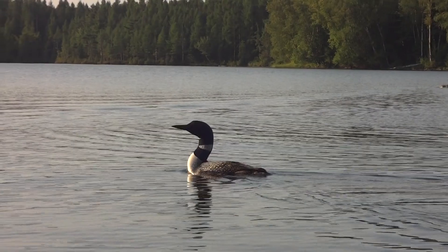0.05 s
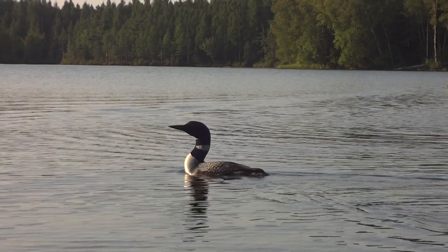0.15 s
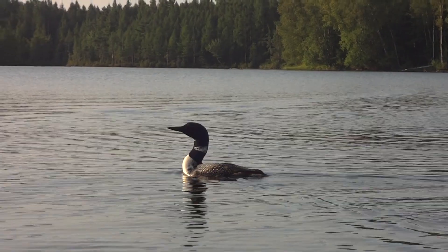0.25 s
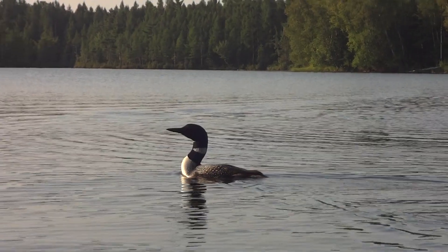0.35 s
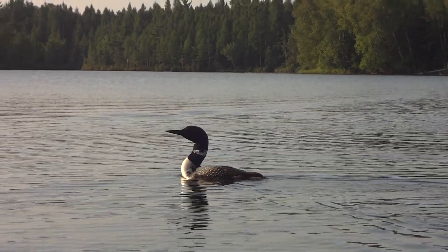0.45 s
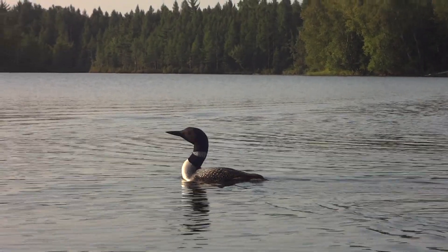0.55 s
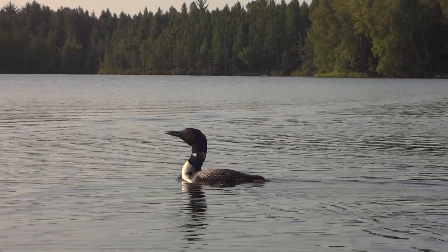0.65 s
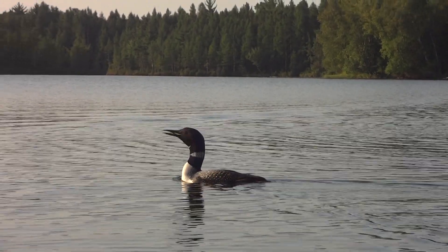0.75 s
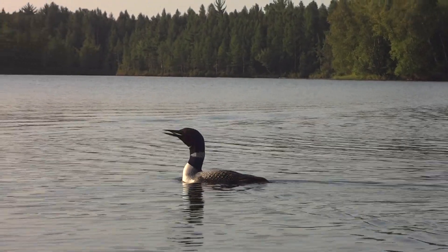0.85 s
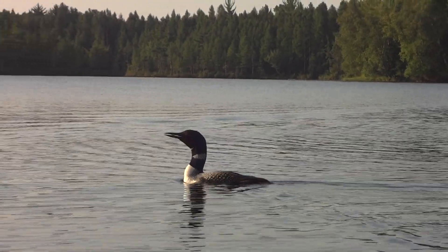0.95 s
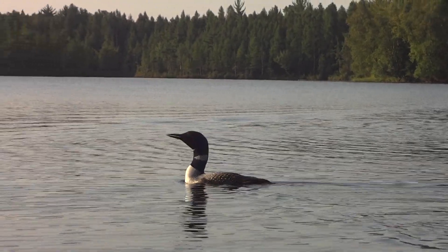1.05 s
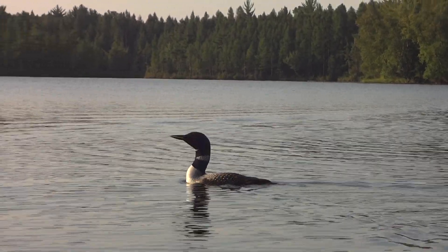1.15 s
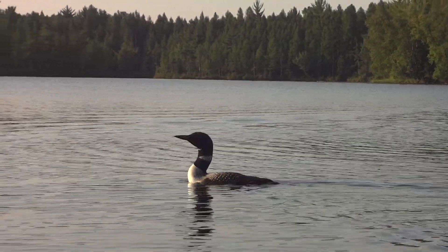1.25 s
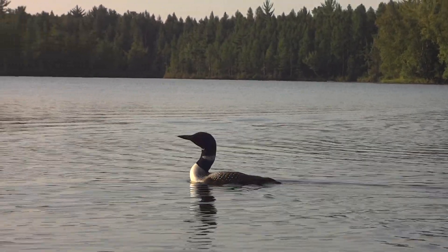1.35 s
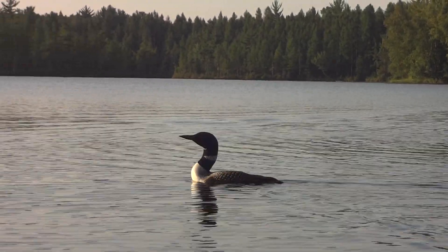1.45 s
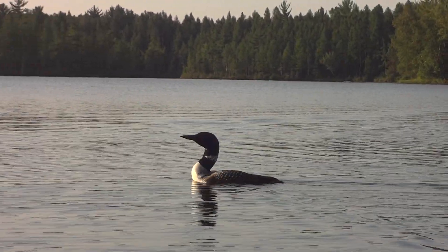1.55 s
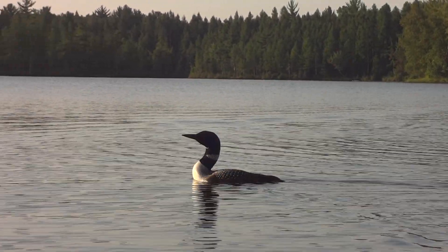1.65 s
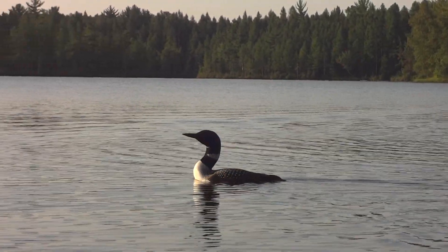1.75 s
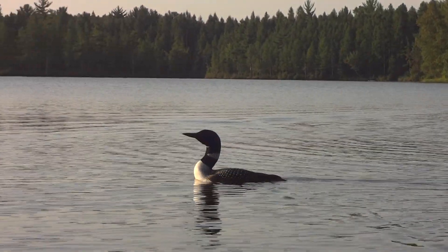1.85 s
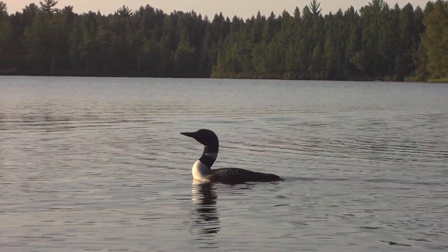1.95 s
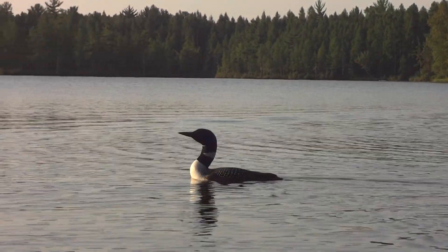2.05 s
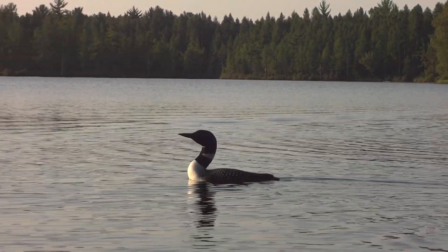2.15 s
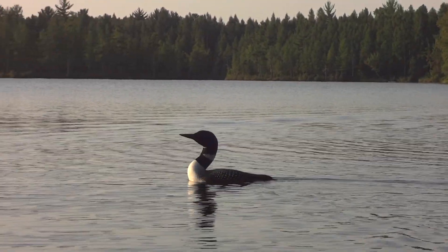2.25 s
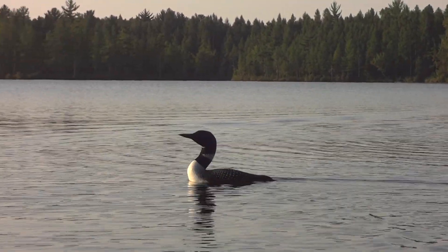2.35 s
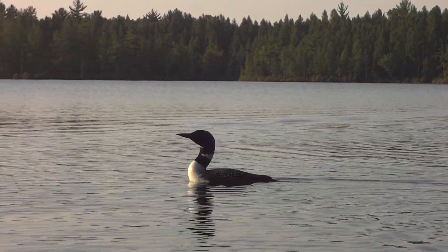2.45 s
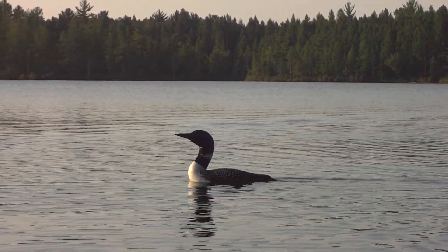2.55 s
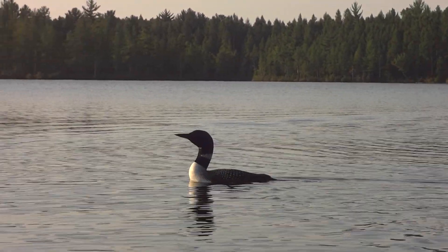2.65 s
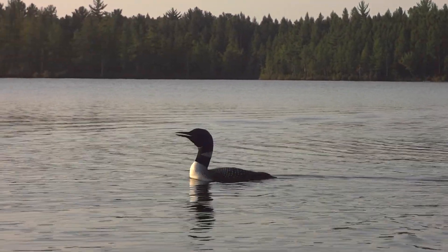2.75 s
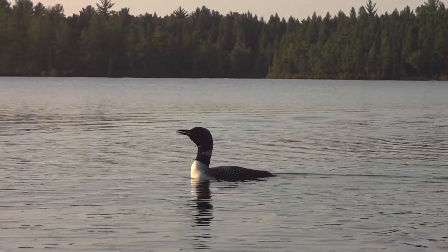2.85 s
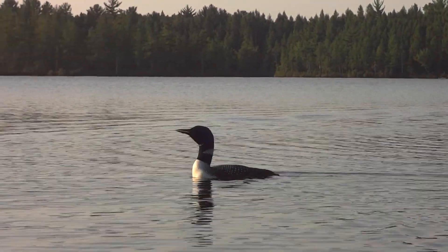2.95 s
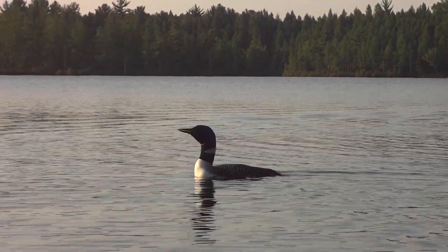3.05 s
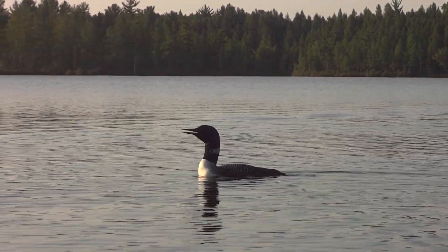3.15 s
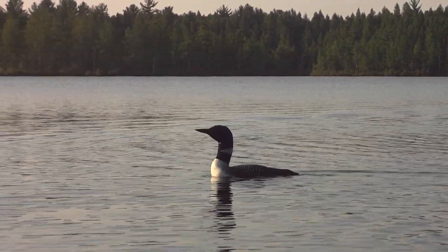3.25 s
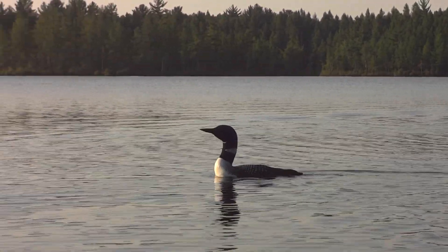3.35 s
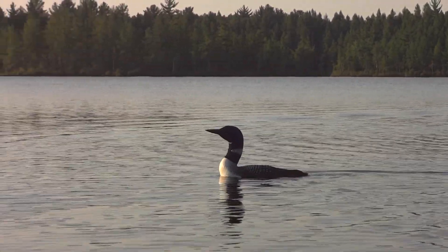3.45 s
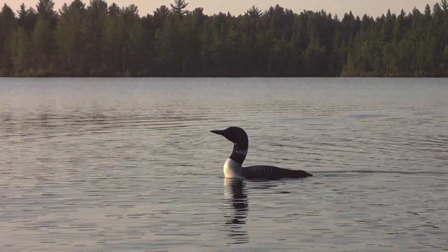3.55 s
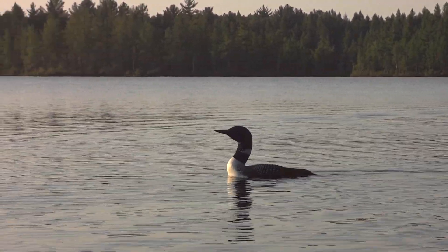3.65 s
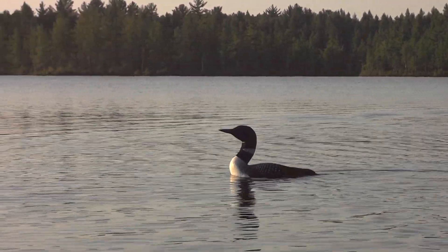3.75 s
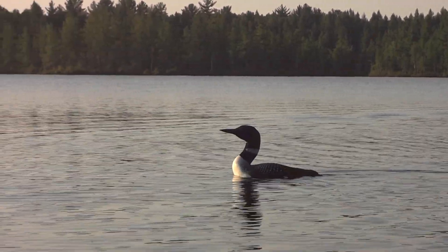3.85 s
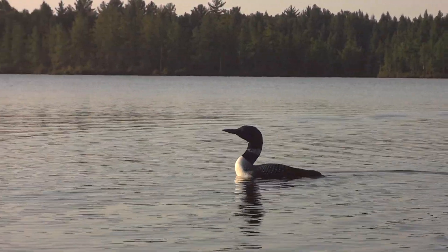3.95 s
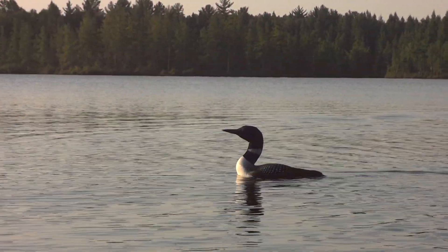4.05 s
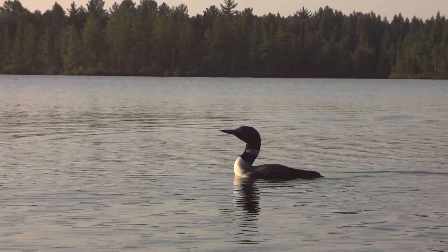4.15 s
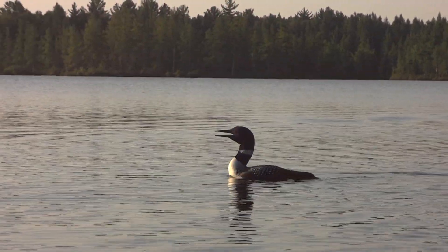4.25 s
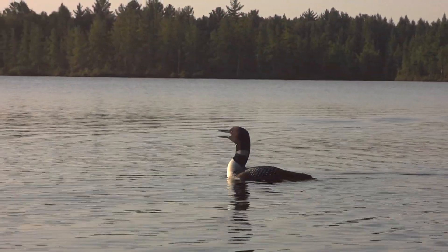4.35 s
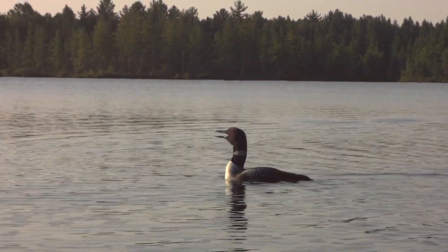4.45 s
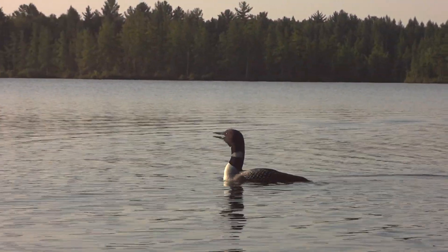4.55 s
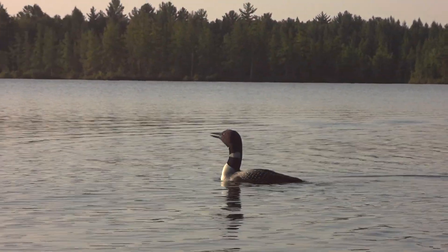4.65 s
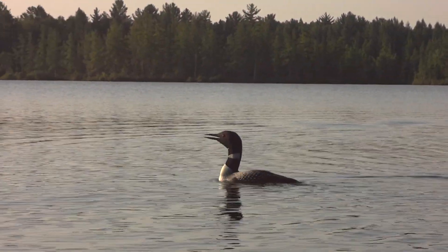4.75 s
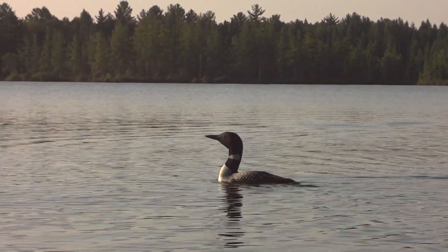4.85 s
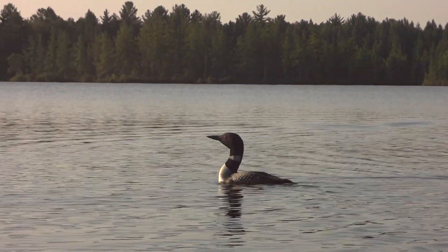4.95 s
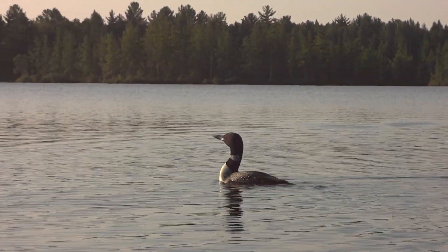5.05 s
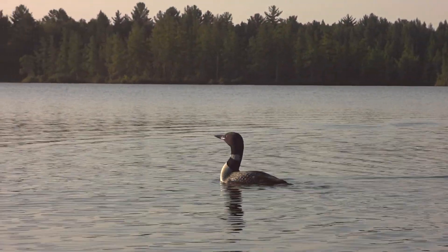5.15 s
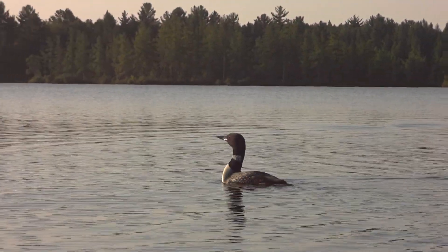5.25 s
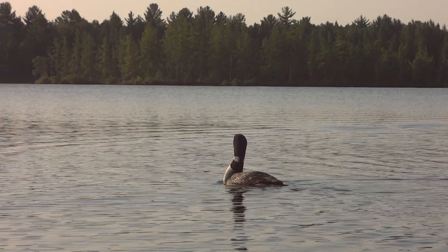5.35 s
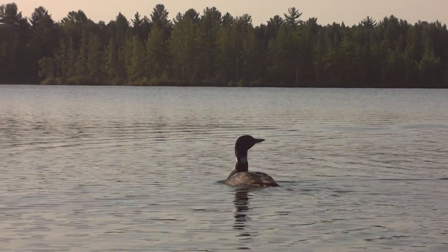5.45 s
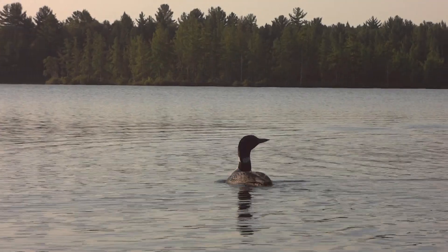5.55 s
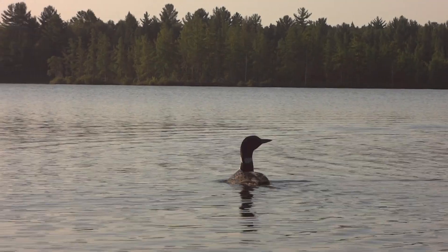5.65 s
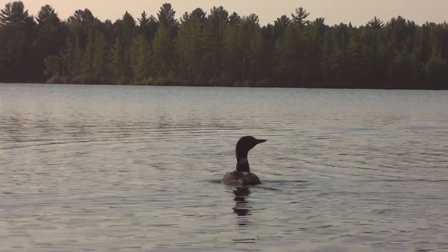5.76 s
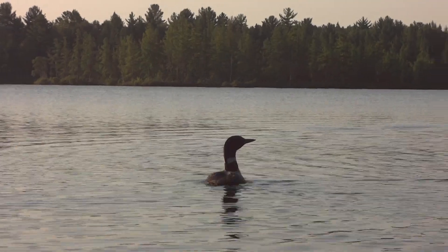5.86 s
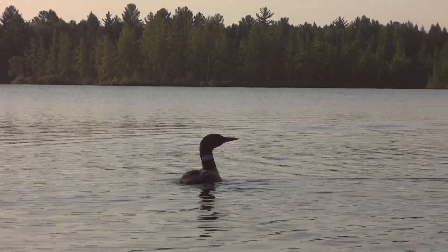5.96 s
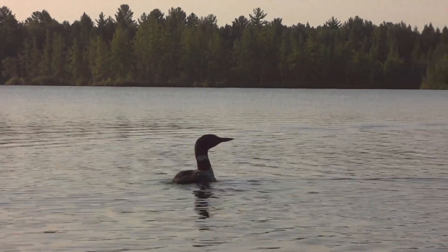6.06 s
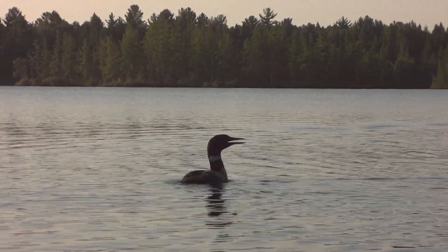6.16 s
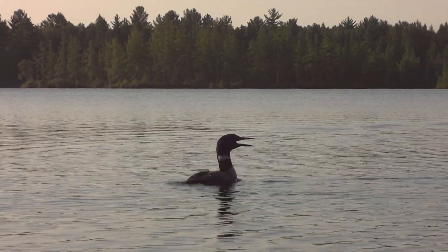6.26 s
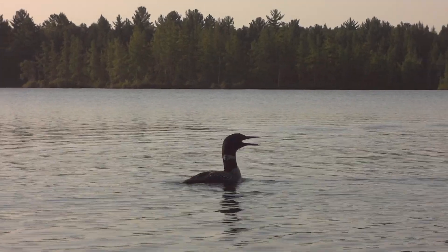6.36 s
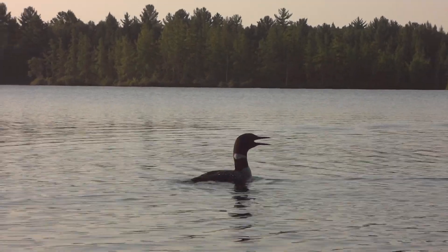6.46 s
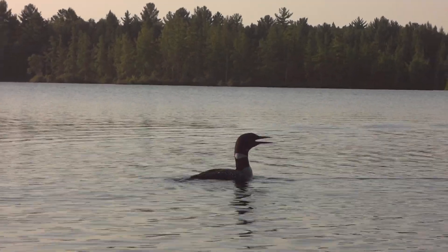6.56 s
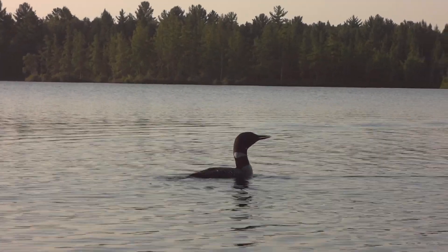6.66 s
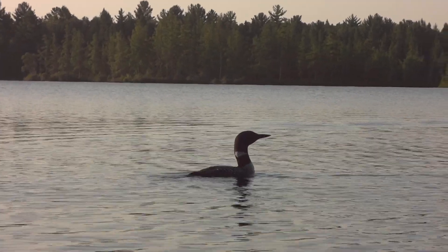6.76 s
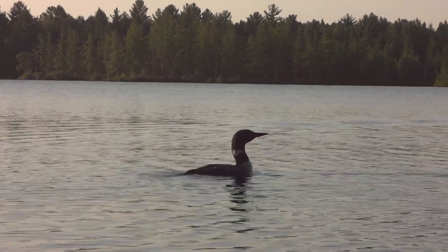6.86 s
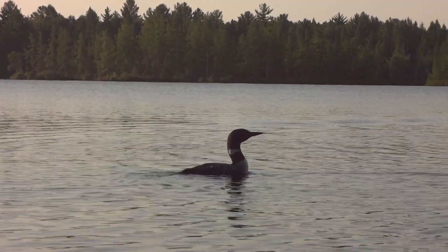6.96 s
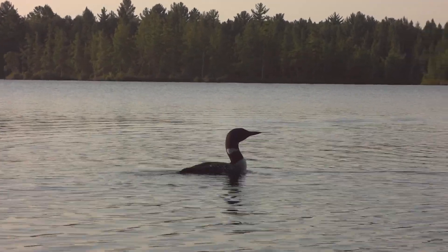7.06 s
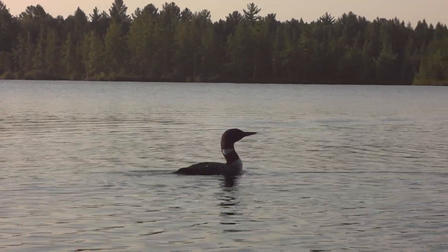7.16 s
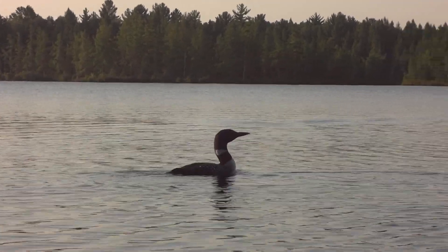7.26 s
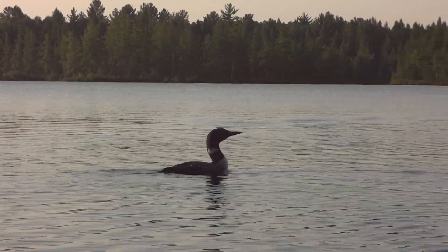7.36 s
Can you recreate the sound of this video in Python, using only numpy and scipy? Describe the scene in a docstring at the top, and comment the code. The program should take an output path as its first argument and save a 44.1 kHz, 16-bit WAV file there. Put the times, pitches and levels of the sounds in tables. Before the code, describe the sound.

Rapid, laughing loon tremolos ring over quiet water, each followed by a distant bird's softer reply, above low air rumble and faint ripples.

```python
"""Loon tremolos on a calm lake

Stereo camera microphone on a calm lake: a loon right of centre gives four loud tremolos; a second loon,
farther off and further right, answers softly. Rotating vibrations leap between two registers, at moments
beating with extra tones; throat resonances shape the overtones. The wooded shore echoes, mostly .85 s later.
Shaped noise makes air rumble, ripples, hiss, bumps and ticks at the microphone; thin tones make the whine.
Gain control flattens the crests and lets the background back slowly. Table levels are ahead of it.
"""
import sys
import numpy as np
from scipy import signal
from scipy.fft import rfft, irfft
from scipy.io import wavfile
from scipy.ndimage import uniform_filter1d

SR = 44100
rng = np.random.default_rng(int(sys.argv[2]) if len(sys.argv) > 2 else 0)


def unload_audio(sound):
    """Save the sound as a 16-bit wav file, at the path given as the first command line argument."""
    columns = np.transpose(np.atleast_2d(sound))
    # keep every value between -1 and 1, then stretch to whole-number steps
    steps = np.round(np.clip(columns, -1, 1) * 32767)
    wavfile.write(sys.argv[1], SR, steps.astype(np.int16))


N = 326340

# air moving on the microphone, before its flutter: t/s, level/dB
RUMBLE_LEVEL = [(0, -49), (1.3, -52), (1.55, -48), (2, -52), (2.7, -53), (3.5, -55.5), (3.9, -42.5),
                (4.3, -54.5), (4.8, -49), (5.6, -52.5), (6.2, -54), (6.9, -47.5), (7.4, -49)]
# relative spectrum of the rumble: f/Hz, density/dB per Hz
RUMBLE_COLOUR = [(20, 0.5), (40, 3), (90, -0.5), (130, -11), (200, -20), (320, -33), (600, -48.5)]
# ripples and distant trees, before their flutter: t/s, level/dB
RIPPLE_LEVEL = [(0, -63), (.6, -64.5), (1.4, -59.5), (2.2, -62), (2.7, -63.5), (4.2, -64), (4.9, -54.5),
                (5.3, -53.5), (5.9, -58), (6.3, -59.5), (7.4, -63)]
# relative spectrum of the ripples: f/Hz, density/dB per Hz
RIPPLE_COLOUR = [(100, -9), (250, 0), (500, -0.5), (1200, -4.5), (2500, -10), (4500, -15), (7000, -18),
                 (15000, -21.5)]
# camera electronics, steady tones that waver slightly: centre f/Hz, level/dB
WHINE = [(13487, -85), (13906, -86.5), (15734, -90.5)]
# one row per call, the loud ones from the near loon, the soft ones from the far loon: start t/s, end t/s,
# mid closing note f/Hz, level between pulses/dB, closing level/dB, fade-out/s, left minus right/dB
CALLS = [ (0.161, 0.224, 797, -41.5, -59, 0.041, -3), (0.671, 1.265, 549, -19, -23, 0.033, -1.8),
         (1.443, 2.021, 641, -31.5, -40, 0.011, -3.4), (2.787, 3.326, 526, -20, -26, 0.051, -2),
         (3.56, 4.07, 677, -39.5, -48, 0.013, -4.5), (4.322, 4.943, 553.4, -20, -22.5, 0.032, -2),
         (4.987, 5.658, 669, -26.5, -38.5, 0.036, -4), (6.253, 6.842, 551, -22.5, -33, .015, -2.2),
         (6.82, 7.003, 693, -40.5, -45.5, 0.017, -4.7), ]
# tremolo pulses: crest t/s, swoop from f/Hz, swoop to f/Hz, crest level/dB, overtone lift/dB
# (in the low register the level is capped)
PULSES = [ (0.193, 639.4, 880, -34.5, 15), (0.69, 560, 695.6, -16.5, 4), (0.777, 630, 1146, -10.5, 10.5),
          (0.871, 986, 1457, -6.5, 1.5), (.967, 1065, 1433, -6.5, 8.5), (1.069, 1069, 1361, 0.5, 3),
          (1.188, 605, 1010, -12.5, 10), (1.449, 900, 904, -30, 14.5), (1.542, 817, 992, -29.5, 17),
          (1.618, 1124, 1349, -16.5, 15), (1.711, 1197, 1322, -14.5, 10.5), (1.792, 1177, 1382, -18, 7.5),
          (1.888, 1097, 1260, -17, 12), (1.972, 988, 1031, -33, -0.5), (2.82, 600, 738.7, -17.5, 10.5),
          (2.904, 885, 1143, -10, 7.5), (3.0, 850, 1393, -9, 4.5), (3.103, 1043, 1356, -3.5, 6.5),
          (3.211, 608, 1043, -10, 8), (3.573, 800, 877, -33, 10), (3.659, 690, 980, -21, 12.5),
          (3.744, 960, 1322, -22, 7.5), (3.826, 1291, 1443, -30, 19), (3.908, 1310, 1446, -35, 20),
          (3.997, 1288, 1442, -35.5, 12), (4.34, 590, 689.4, -16, 8.5), (4.427, 628, 1149, -12, 0.5),
          (4.525, 1050, 1398, -7, -1.5), (4.618, 1084, 1425, -3, -1), (4.718, 1067, 1371, 2, 4.5),
          (4.823, 1040, 1292, 3, 8), (5.044, 670, 860, -33.5, 9), (5.138, 748, 1339, -19.5, -4),
          (5.225, 1117, 1379, -26.5, 8.5), (5.311, 1076, 1353, -23, -8.5), (5.401, 1067, 1306, -21, -9.5),
          (5.492, 1031, 1350, -20.5, -3.5), (5.566, 1064, 1081, -30, -2), (6.26, 600, 654.4, -16.5, 8),
          (6.354, 606, 1155, -10, 3), (6.446, 989, 1393, -7, 6.5), (6.545, 1089, 1367, -2, 12.5),
          (6.647, 1060, 1320, -5.5, 11), (6.773, 602, 948, -16.5, 2), (6.828, 850, 916, -39, -17),
          (6.923, 765, 1233, -27.5, 3), ]
# register flips, from a low opening to a low closing note: t/s
BREAKS = [.212, .748, 1.123, 1.17, 1.231, 1.553, 1.995, 2.828, 3.158, 3.194, 3.276, 3.664, 4.045, 4.4,
          4.866, 5.094, 5.574, 6.33, 6.702, 6.758, 6.81, 6.898, 6.973]
# brief extra loon tones: second notes beating with a call, snatches of the other loon's call, faint lone hoots:
# start t/s, end t/s, start f/Hz, middle f/Hz, end f/Hz, level/dB
EXTRA_TONES = [(.812, .834, 800, 760, 780, -35), (.864, .908, 1680, 1660, 1420, -20),
               (.966, 1.0, 1700, 1640, 1480, -19), (1.765, 1.8, 1330, 1550, 1570, -26),
               (2.984, 3.034, 1130, 1200, 1090, -17), (4.452, 4.48, 1000, 880, 820, -32),
               (4.61, 4.634, 1720, 1730, 1660, -36), (5.385, 5.42, 1000, 970, 920, -39),
               (6.37, 6.405, 1660, 1730, 1650, -41), (6.385, 6.5, 730, 830, 950, -40),
               (6.51, 6.585, 1080, 1270, 1040, -25), (6.77, 6.812, 1060, 1130, 1260, -30),
               (.265, .305, 740, 830, 710, -56), (3.49, 3.52, 630, 580, 570, -46)]
# overtone strength through throat and bill, before effort brightens it: f/Hz, level/dB re the fundamental
THROAT = [(1100, -3), (1400, -7), (1700, -21), (2000, -36), (2300, -41), (2650, -51), (3200, -41),
          (3700, -52), (4400, -43), (5300, -55), (6700, -74), (10000, -72), (13000, -74), (15500, -87)]
# calls at the two microphone ports: f/Hz, phase by which the left port leads/rad
PORT_PHASE = [(0, 0), (780, -0.13), (1400, -0.31), (5680, 0), (15400, 0)]
# soft knocks on the camera and small plops of water: t/s, f/Hz, swell length (one sigma)/s, level/dB
BUMPS = [(0.566, 110, 0.034, -44.5), (0.622, 158, 0.0079, -27), (0.647, 101.3, 0.037, -37.5),
         (0.698, 139, 0.025, -30), (7.038, 98.6, 0.018, -23), (7.042, 230, 0.011, -37.5),
         (5.058, 270, 0.032, -48.5), (5.163, 290, 0.012, -52.5), (5.646, 245, 0.0058, -45),
         (5.971, 621, .015, -50), (6.194, 89.9, 0.041, -44.5)]
# small dry ticks: t/s, level/dB
TICKS = [(0.447, -58.5), (3.149, -46), (3.278, -47.5)]
# relative spectrum of the ticks: f/Hz, density/dB per Hz
TICK_COLOUR = [(1500, -34), (3500, -0.5), (6000, -9), (9000, -17), (15000, -23)]

TIME = np.arange(N) / SR
SPECTRUM_HZ = np.arange(N // 2 + 1) * SR / N
SIDES = np.array([[1], [-1]])  # left, right
TOP_HZ = 15800  # overtones and the finished sound stop here

RISE_S = .05  # longest upswing of a pulse; otherwise half the time since the last crest
LOW_REGISTER = 0.75  # pitch of the low register over that of the high one, at equal tension
BREAK_S = 0.0062  # the voice stalls while it changes register
ARCH_POWER = 1.15  # above 1, the pitch lingers on the crests
SWELL_POWER = 1.52  # above 1, the loud part of a pulse is broad
SWELL_LEAD_S = 0.0041  # the push of air comes a little ahead of the pitch
SLACK_OVERTONES_DB = -6.5  # the voice is duller between pulses
LOW_SAG_DB_PER_S = 2.5  # the low register's ceiling sinks through a call
FALL_SHARE = .8  # the last pulse heads down to this share of its pitch
CLOSING_SINK_PER_S = 1.4  # share of its middle pitch that the closing note loses per second
CLOSING_OVERTONES_DB, FADE_DB = -13, 23.5  # closing note: dullness, depth of the fade-out


def undb(db):
    """Decibels to gain."""
    return 10 ** (np.asarray(db) / 20)


def curve(rows):
    """Join (t/s, value) rows by straight lines."""
    return np.interp(TIME, *np.transpose(rows))


def colour(hz, points):
    """Gain of an (f/Hz, dB) spectrum at the given frequencies, joined on a logarithmic pitch scale."""
    f, db = np.transpose(points)
    return undb(np.interp(np.log(hz + 1e-9), np.log(f), db))


def noise(points):
    """Noise of rms 1 with the given spectrum, fading away above its last point."""
    top_fade = 1 + (SPECTRUM_HZ / points[-1][0] / 2) ** 4
    spectrum = rfft(rng.standard_normal(N)) * colour(SPECTRUM_HZ, points) / top_fade
    y = irfft(spectrum, N)
    return y / y.std()


def wide(points, side_db, side_tilt_db=0):
    """Stereo noise: a common part and an opposed part, the latter tilted by so many dB an octave."""
    opposed = noise([(hz, db + side_tilt_db * np.log2(hz)) for hz, db in points])
    return noise(points) + undb(side_db) * opposed * SIDES


def walk(rate):
    """Smooth random wandering with spread 1, from so many random values a second."""
    k = max(int(SR / rate), 1)
    steps = np.repeat(rng.standard_normal(N // k + 1), k)
    y = uniform_filter1d(steps, k)[:N]
    return y / y.std()


def lake(hiss_db=-71):
    """Air rumble and lapping ripples as fluttering noise, with the camera's own hiss and whine."""
    rumble_db = curve(RUMBLE_LEVEL) + 1.6 * walk(8.2)
    rumble = wide(RUMBLE_COLOUR, side_db=-12.5, side_tilt_db=4.5) * undb(rumble_db)
    ripple_db = curve(RIPPLE_LEVEL) + walk(12)
    ripple = wide(RIPPLE_COLOUR, side_db=-1, side_tilt_db=-4) * undb(ripple_db)
    hiss = undb(hiss_db) * wide([(1000, 0), (6000, -1), (15000, -3)], side_db=-17)
    whine = np.zeros(N)
    for hz, db in WHINE:
        phase = 2 * np.pi * np.cumsum(hz + 8 * walk(60)) / SR
        whine += np.sqrt(2) * undb(db) * np.sin(phase)
    return rumble + ripple + hiss + whine


def span(start, end, fade):
    """Samples of a note and its gate: the vibration builds from almost nothing, then catches quickly."""
    inside = np.minimum(TIME - start, end - TIME) / fade
    i = np.flatnonzero(inside > -12)
    return i, (1 + inside[i] / np.hypot(inside[i], 1)) / 2


def tremolo(t, call, breaks):
    """Pitch, level and overtones in low and high register: all swing up with a pulse, then slacken."""
    start, _, _, slack_db, *_ = call
    pulses = [p for p in PULSES if start < p[0] < breaks[-1]]
    crest, from_hz, to_hz, crest_db, over_db = np.transpose(pulses)
    rise = np.minimum(RISE_S, np.diff(crest, prepend=-1) / 2)
    turns = np.c_[crest - rise, crest].ravel()

    # tension is expressed as pitch in the high register
    low = np.searchsorted(breaks, turns) % 2 == 0
    tension = np.c_[from_hz, to_hz].ravel() / np.where(low, LOW_REGISTER, 1)
    turns = np.r_[turns, max(breaks[-1], crest[-1] + RISE_S)]
    tension = np.r_[tension, FALL_SHARE * tension[-1]]
    steps = np.arange(len(turns))

    stage = np.interp(t, turns, steps)  # even when slack, odd on a crest
    slack = np.cos(np.pi / 2 * stage) ** 2
    arch = slack ** ARCH_POWER
    travelled = np.where(stage % 2 < 1, 1 - arch, arch)
    hz = np.interp(np.floor(stage) + travelled, steps, tension)

    push = np.interp(t + SWELL_LEAD_S, turns, steps)
    pulse_db = crest_db[np.minimum(push // 2, len(crest_db) - 1).astype(int)]
    push_slack = (np.cos(np.pi / 2 * push) ** 2) ** SWELL_POWER
    level_db = pulse_db + (slack_db - pulse_db) * push_slack
    # the low register is never louder than the opening pulse
    low_db = np.minimum(level_db, crest_db[0] - LOW_SAG_DB_PER_S * (t - start))
    bright_db = np.interp(t, crest, over_db) + SLACK_OVERTONES_DB * slack
    return (hz * LOW_REGISTER, low_db, bright_db), (hz, level_db, bright_db)


def closing(t, call, breaks):
    """The dull low note that ends a call: its pitch sinks a little and it fades."""
    _, end, hz, _, db, fade_out_s, _ = call
    sink = CLOSING_SINK_PER_S * (t - (breaks[-1] + end) / 2)
    faded = np.clip(1 - (end - t) / fade_out_s, 0, 1)
    return hz * (1 - sink), db - FADE_DB * faded, np.full(len(t), CLOSING_OVERTONES_DB)


def vibration(jitter=.002, shimmer_db=.2, fade_s=.0028):
    """Calls and extra tones summed as one rotating vibration, with its mean pitch and overtone lift."""
    swing = np.zeros(N, complex)
    control, weight = np.zeros((2, N)), np.full(N, 1e-9)
    waver, flutter_db = 1 + jitter * walk(760), shimmer_db * walk(250)

    for call in CALLS:
        breaks = np.array([s for s in BREAKS if call[0] < s < call[1]])
        starts = np.r_[call[0], breaks + BREAK_S / 2]
        ends = np.r_[breaks - BREAK_S / 2, call[1]]
        for k, (start, end) in enumerate(zip(starts, ends)):
            i, gate = span(start, end, fade_s)
            t = np.clip(TIME[i], start, end)
            if k < len(breaks):
                hz, level_db, bright_db = tremolo(t, call, breaks)[k % 2]  # low and high by turns
            else:
                hz, level_db, bright_db = closing(t, call, breaks)
            turning = np.exp(2j * np.pi * np.cumsum(hz * waver[i]) / SR)
            swing[i] += gate * undb(level_db + flutter_db[i]) * turning
            control[:, i] += gate * np.array([hz, bright_db])
            weight[i] += gate

    for start, end, *bend_hz, db in EXTRA_TONES:
        i, gate = span(start, end, fade_s)
        share = np.clip((TIME[i] - start) / (end - start), 0, 1)
        hz = np.polyval(np.polyfit([0, .5, 1], bend_hz, 2), share)
        size = gate * undb(db)
        swing[i] += size * np.exp(2j * np.pi * np.cumsum(hz * waver[i]) / SR)
        control[0, i] += size * hz
        weight[i] += size
    return swing, *(control / weight)


def loons(count=20, rasp_db=-56):
    """Nearly pure tones whose overtones sweep through fixed throat resonances; beats spread into them."""
    swing, pitch, bright_db = vibration()
    i = np.flatnonzero(np.abs(swing) > 1e-6)
    size, hz = np.abs(swing[i]), pitch[i]
    turn = swing[i] / size
    voice, partial = swing.imag.copy(), turn
    for k in range(2, count + 1):
        partial = partial * turn
        above = np.clip((k * hz - 1500) / 400, 0, 1)  # effort brightens only above the main resonance
        uneven_db = np.minimum(k * hz / 1000, 5.5) * walk(45)[i]  # higher overtones are less steady
        gain = colour(k * hz, THROAT) * undb(above * (bright_db[i] + uneven_db))
        voice[i] += size * partial.imag * gain * (k * hz < TOP_HZ)
    breath = noise([(300, -19.0), (1200, -8), (2300, -13.5), (4500, -5.5), (6500, -26.5), (14000, -18.5)])
    rasp = undb(rasp_db) * np.abs(swing) * breath
    return np.sqrt(2) * voice + rasp


def shore(calls, echo_db=-42, trip_s=.85, t60_s=2.0, build_s=0.031, near_db=-7, side_db=-8, dull_hz=1700):
    """A faint scatter from the near bank, then the long, dull echo of the forest across the lake."""
    t = TIME[:4 * SR]
    late = np.maximum(t - trip_s, 0)
    forest = undb(-60 * late / t60_s) * (1 - np.exp(-late / build_s))
    bank = undb(near_db - 60 * t / t60_s)
    tail = forest + bank
    mid, side = rng.standard_normal((2, len(t))) * tail / np.sqrt(np.sum(tail ** 2))
    band = signal.butter(2, [800, dull_hz], "bandpass", fs=SR, output="sos")
    dulled = signal.sosfilt(band, calls)
    ports = [signal.fftconvolve(dulled, mid + sign * undb(side_db) * side)[:N] for sign in (1, -1)]
    return undb(echo_db) * np.array(ports)


def knocks(side_db=-2):
    """Short swells of low noise, unlike at the two ports, for bumps and plops; millisecond cracks for ticks."""
    out = np.zeros((2, N))
    for s, hz, length, db in BUMPS:
        swell = np.exp(-.5 * ((TIME - s) / length) ** 2)
        spectrum = [(hz / 4, -6), (hz, 0), (hz * 2, -13), (hz * 5, -45)]
        body = wide(spectrum, side_db, side_tilt_db=3.0) * swell
        # hold the energy of each bump steady, however its noise falls
        level = np.sqrt(np.sum(swell ** 2) / np.sum(body.mean(axis=0) ** 2))
        out += undb(db) * body * level
    crack = noise(TICK_COLOUR)
    for s, db in TICKS:
        out += undb(db) * crack * np.exp(-np.abs(TIME - s) / 0.0039)
    return out


def scene():
    """The near loon right of centre, the far one mostly further right, slightly out of step at the two ports."""
    calls = loons()
    lead = np.interp(SPECTRUM_HZ, *np.transpose(PORT_PHASE))
    pan_db = curve([(s, db) for start, end, *_, db in CALLS for s in (start, end)])
    ports = irfft(rfft(calls) * np.exp(1j * SIDES * lead / 2), N)
    direct = ports * undb(SIDES * pan_db / 2)
    return lake() + direct + shore(calls) + knocks()


def record(dry, release_db_per_s=8):
    """Gain control holds the crests at a ceiling; part of the cut lingers and lets the background back slowly."""
    power = uniform_filter1d(np.abs(signal.hilbert(dry.mean(axis=0))) ** 2 / 2, size=90)
    over_db = np.maximum(10 * np.log10(np.abs(power) + 1e-12) + 9.7, 0)  # excess over a ceiling of -9.7 dB
    release_db = release_db_per_s * TIME
    held_db = np.maximum.accumulate(over_db + release_db) - release_db
    wet = dry * undb(-.4 * over_db - .6 * held_db)
    top_cut = signal.ellip(10, .1, 80, TOP_HZ, fs=SR, output="sos")
    return signal.sosfilt(top_cut, wet)


dry = scene()
out = record(dry)
unload_audio(out)
```